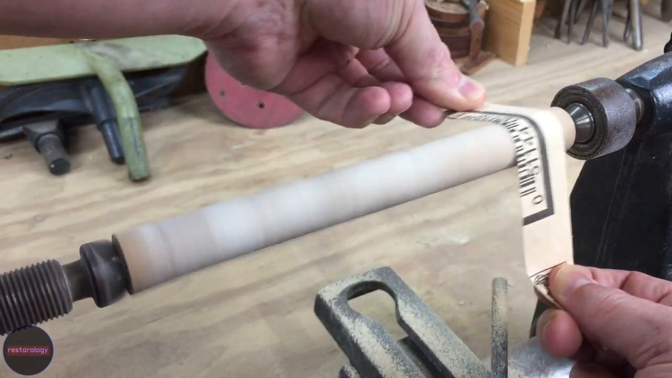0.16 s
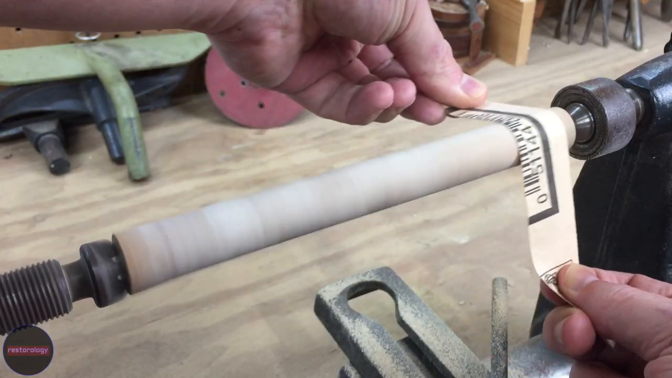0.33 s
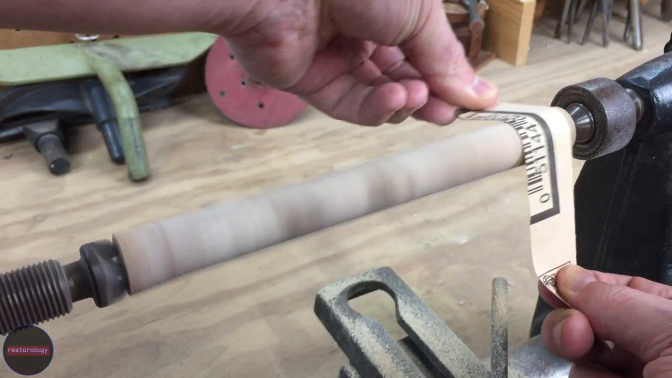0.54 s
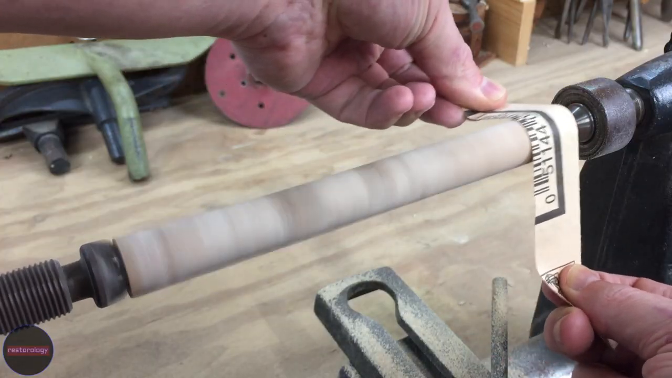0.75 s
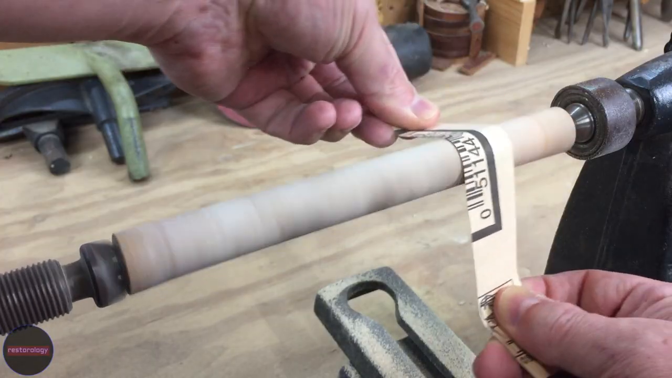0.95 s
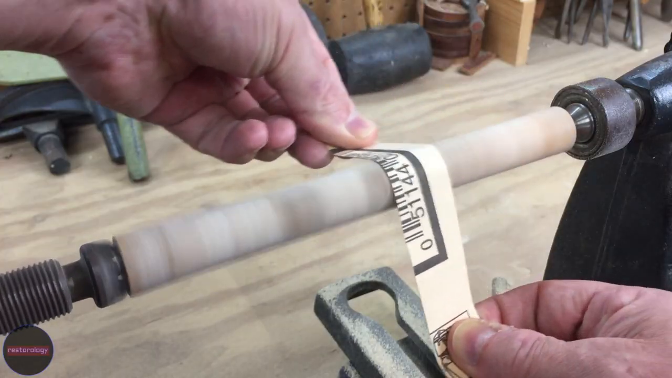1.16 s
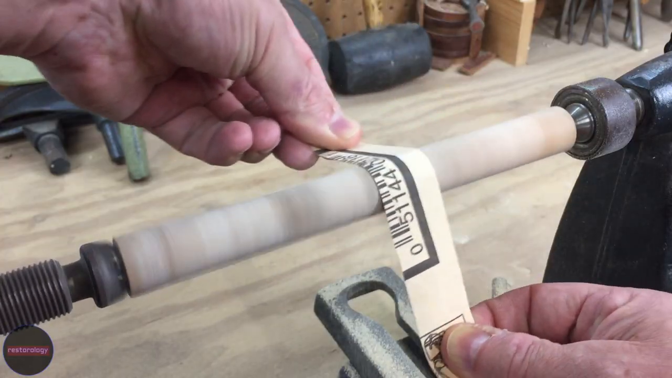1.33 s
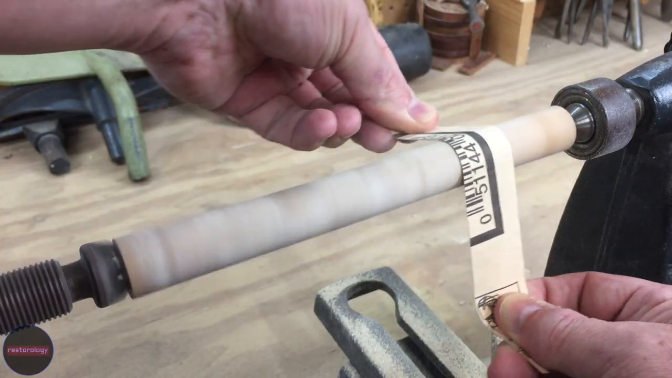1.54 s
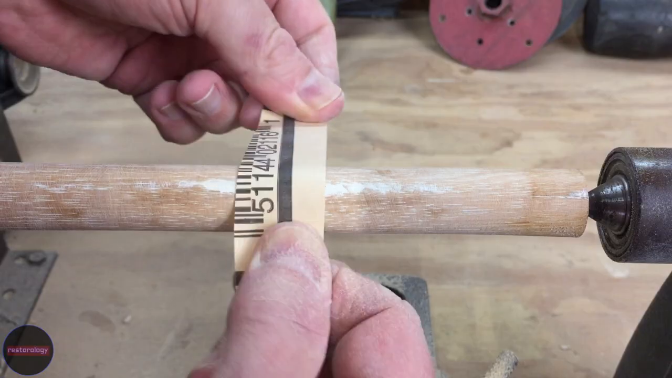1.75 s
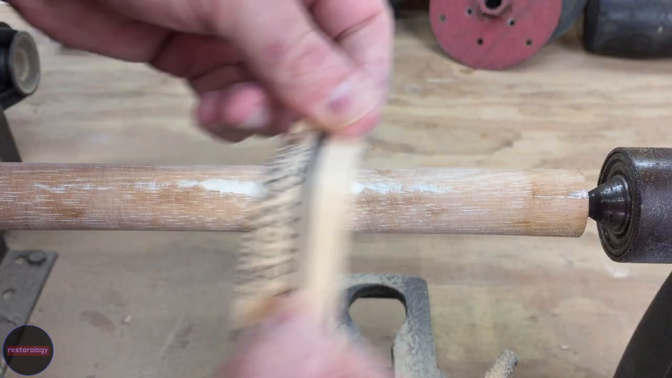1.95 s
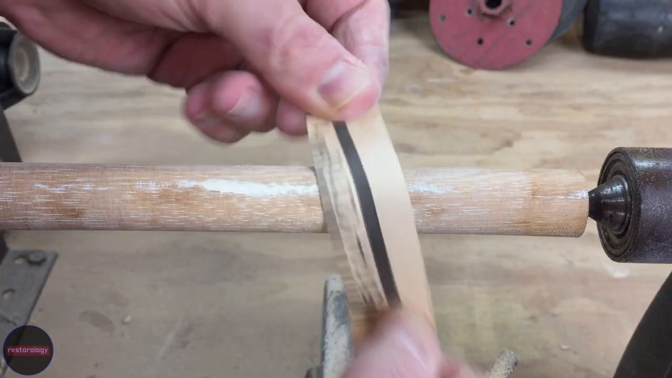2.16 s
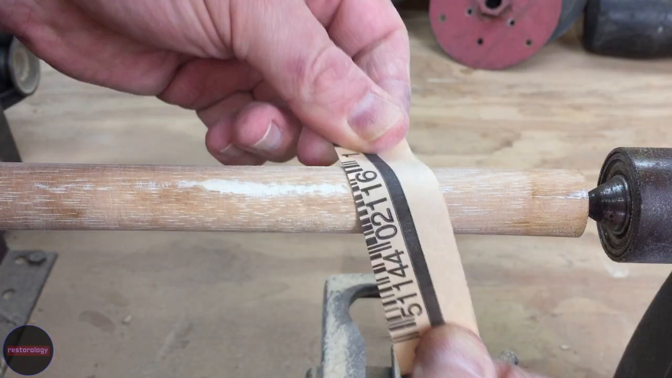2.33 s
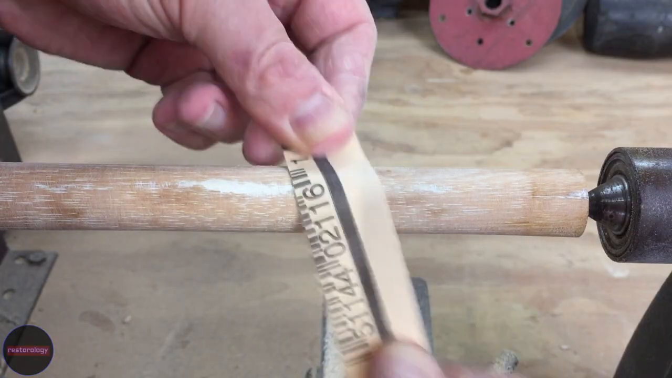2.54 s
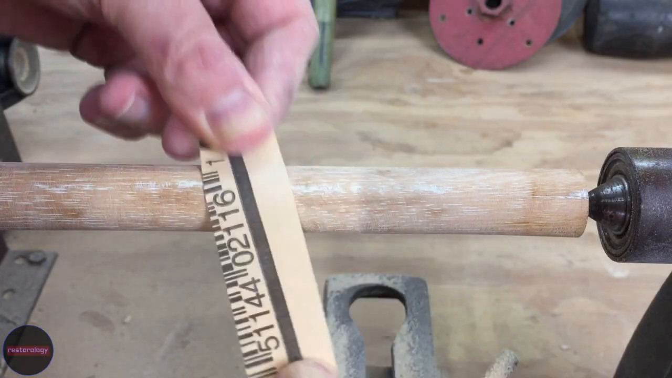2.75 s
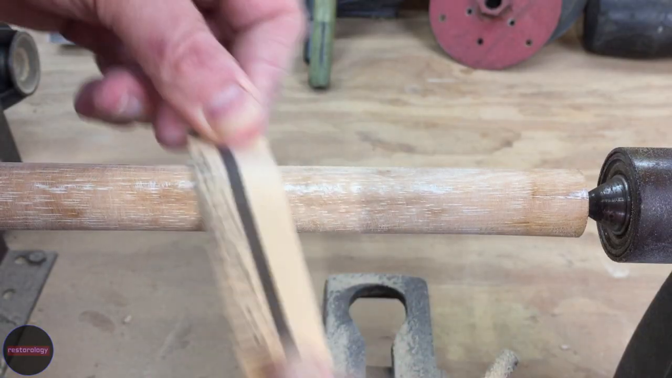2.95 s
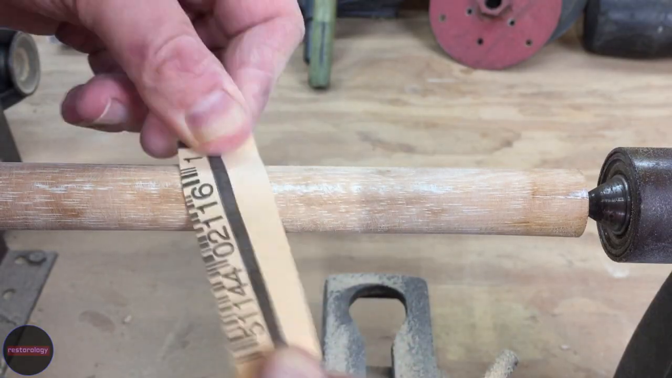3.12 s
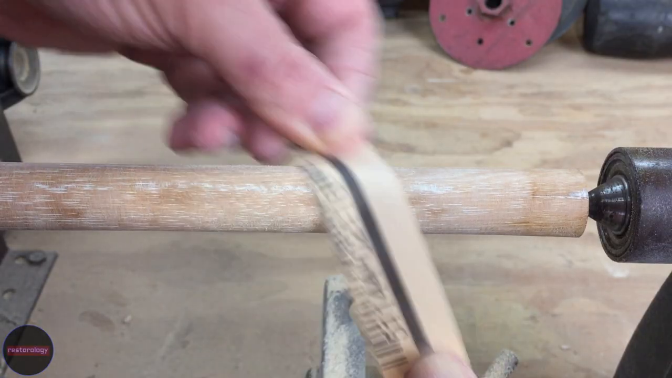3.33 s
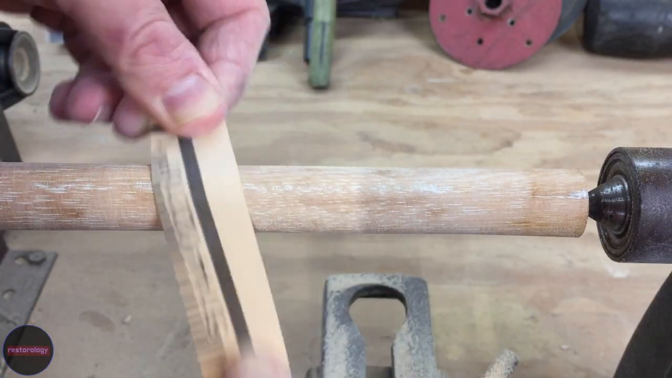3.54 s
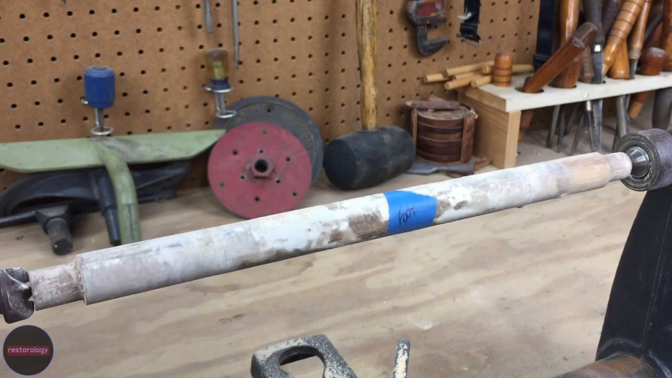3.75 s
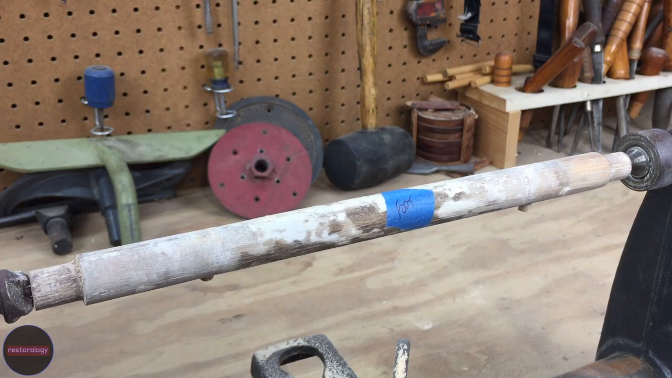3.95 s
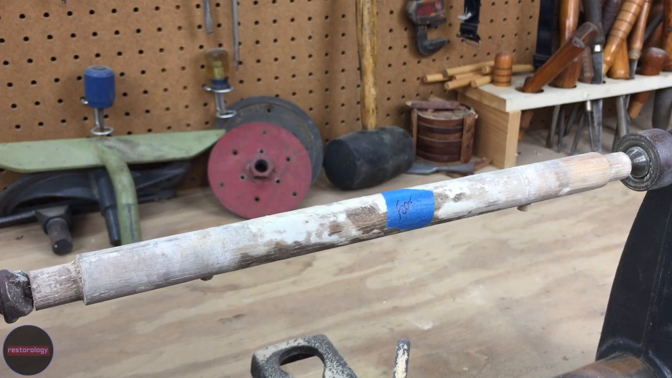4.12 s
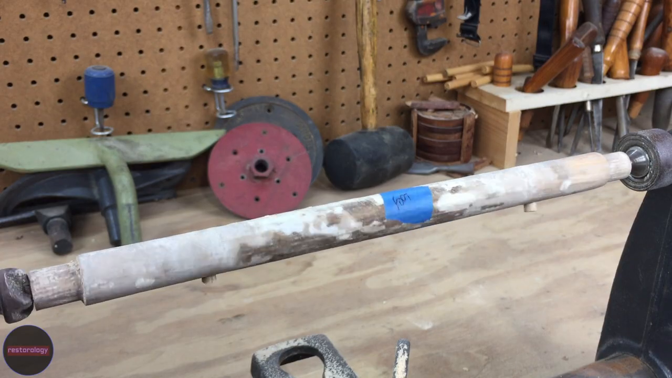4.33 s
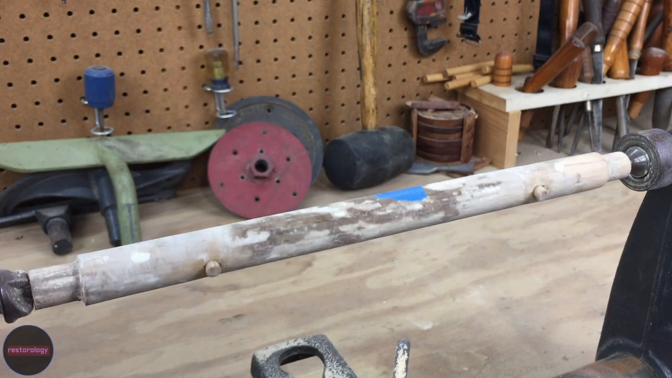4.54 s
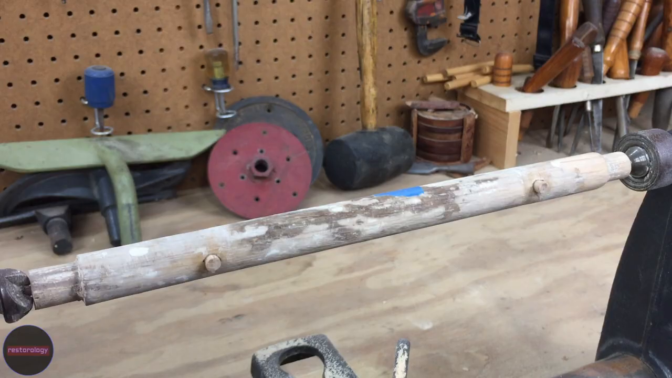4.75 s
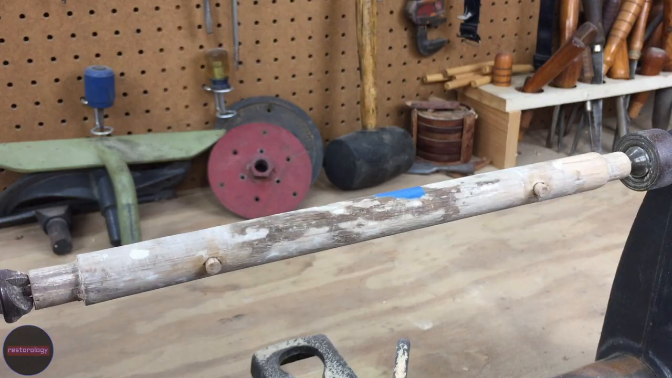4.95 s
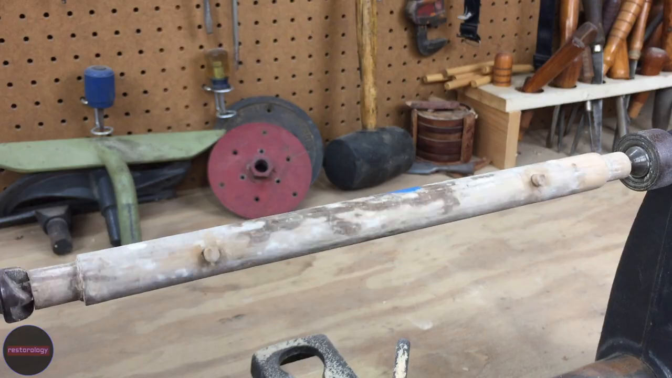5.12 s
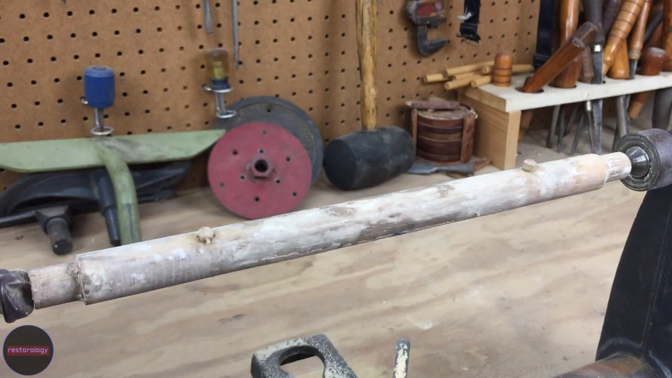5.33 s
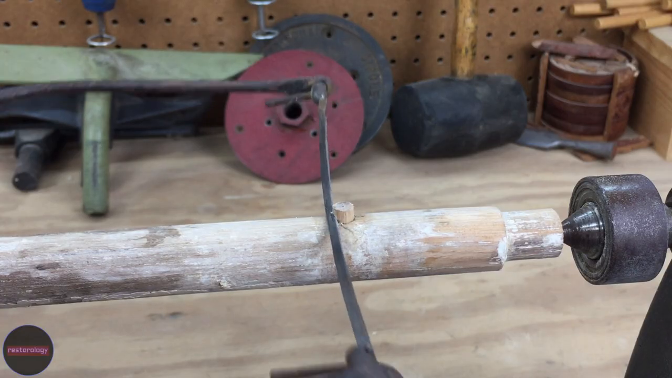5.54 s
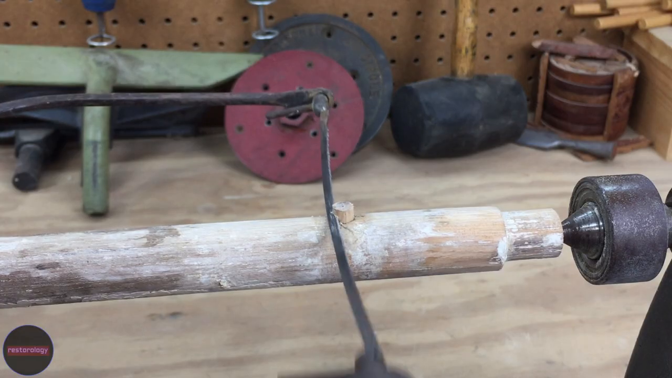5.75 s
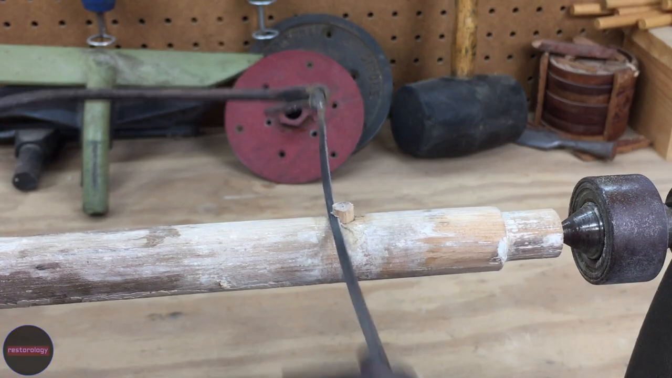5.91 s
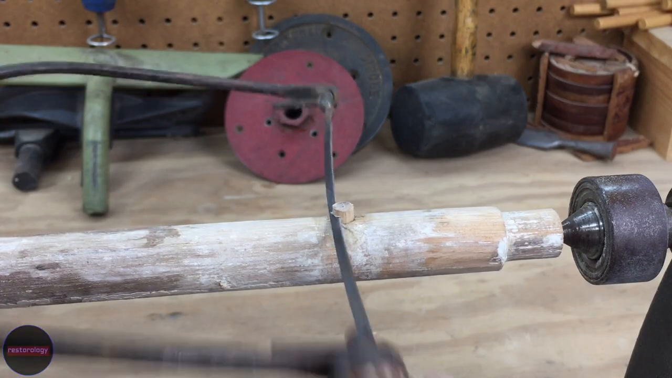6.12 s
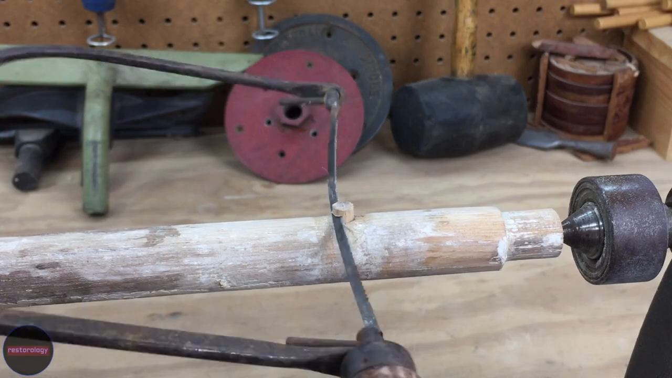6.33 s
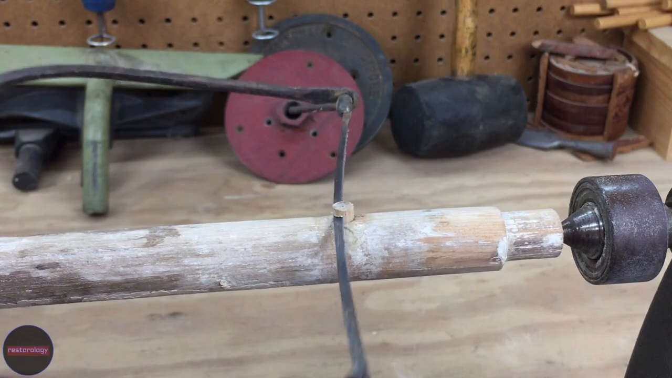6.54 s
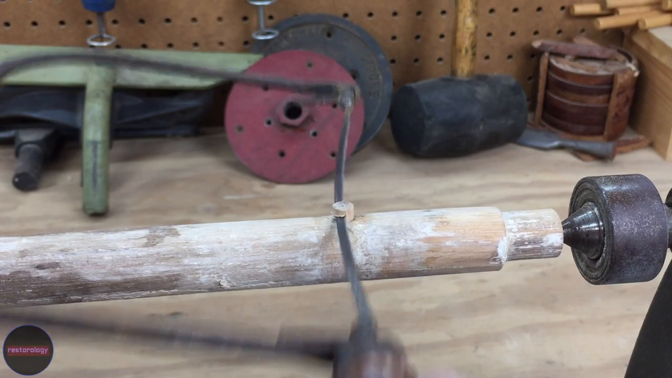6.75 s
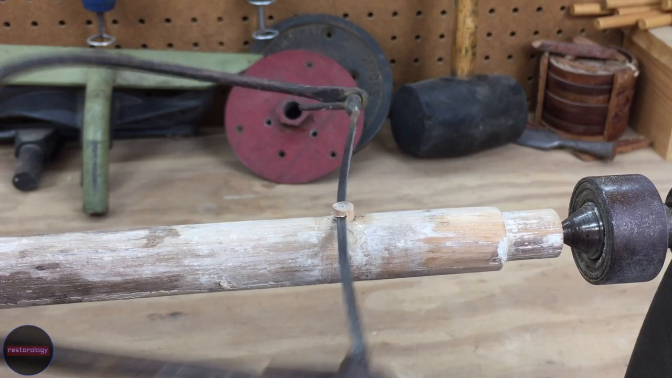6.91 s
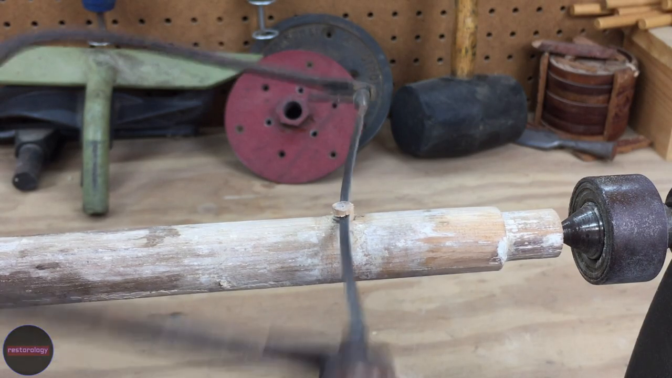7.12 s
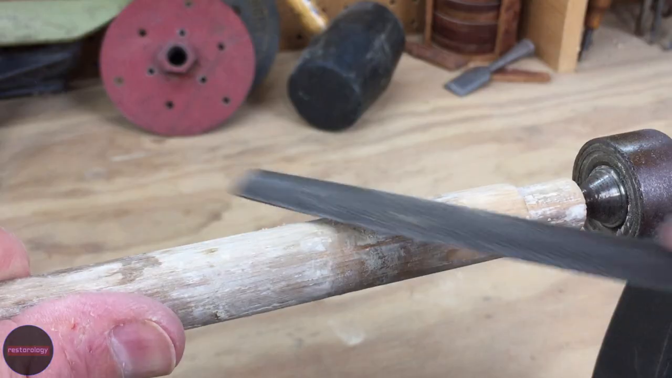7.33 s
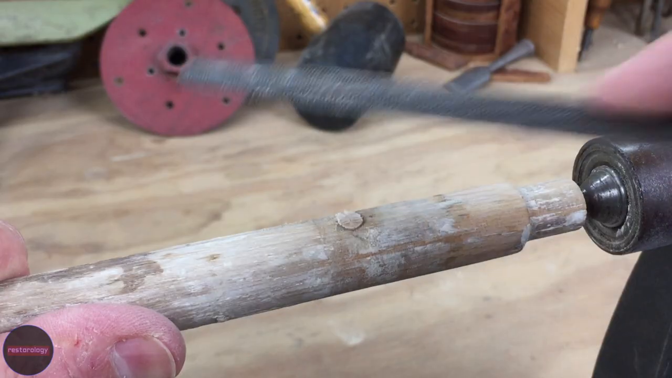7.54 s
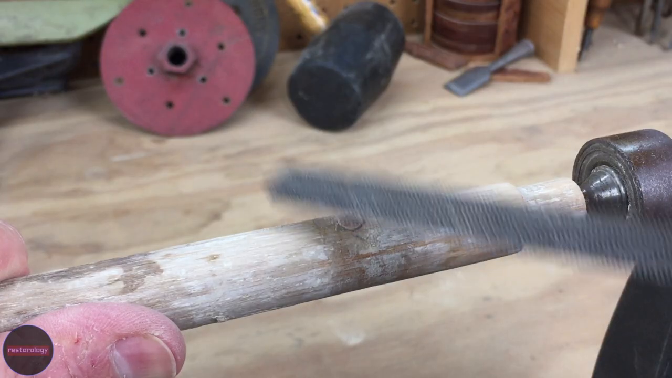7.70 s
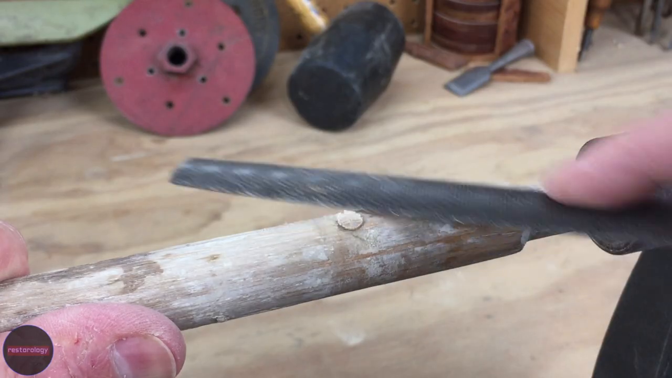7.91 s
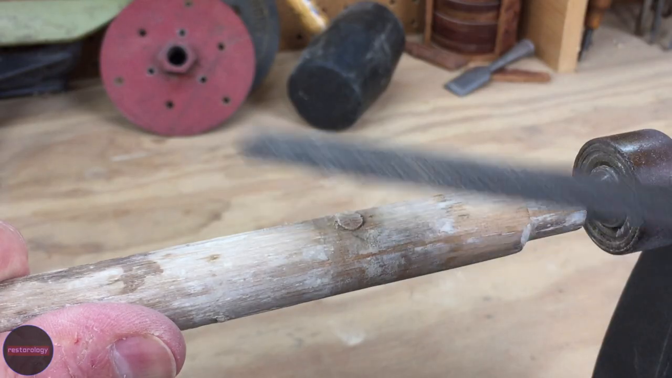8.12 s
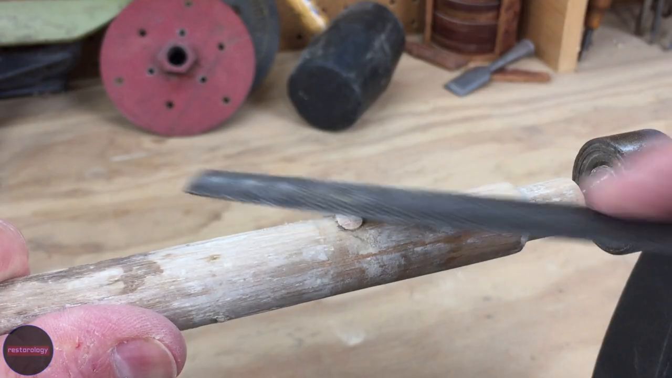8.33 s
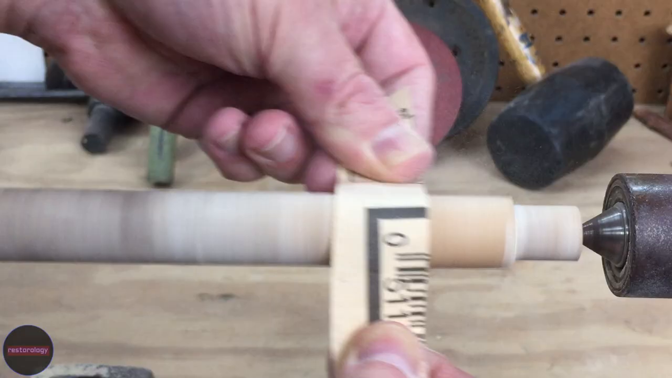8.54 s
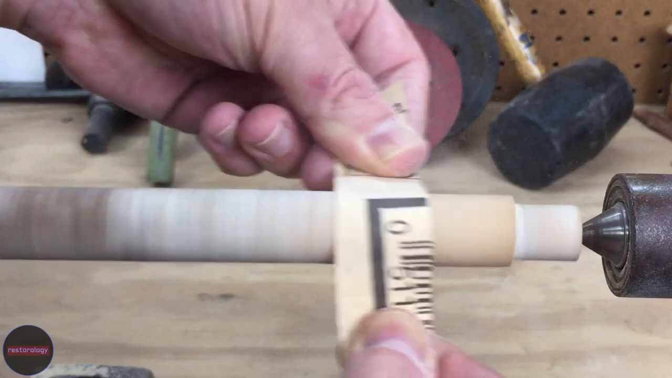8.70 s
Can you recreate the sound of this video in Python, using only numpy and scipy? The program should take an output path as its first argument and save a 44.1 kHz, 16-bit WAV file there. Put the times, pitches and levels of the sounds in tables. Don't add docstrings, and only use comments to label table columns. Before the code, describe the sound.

Steady lathe sanding cuts to frantic paper scrubbing, a quiet gap, buzzing quick saw strokes, three tapping, ringing rasp scrapes, then a returning smooth hiss.

```python
import sys
import numpy as np
from scipy import signal
from scipy.fft import rfft, irfft, next_fast_len
from scipy.io import wavfile
from scipy.ndimage import uniform_filter1d, map_coordinates

SR = 44100
rng = np.random.default_rng(int(sys.argv[2]) if len(sys.argv) > 2 else 0)


def level_to_linear(level):
    exponent = np.asarray(level, float) / 20
    return 10 ** exponent


def store_pcm(level_fs):
    pcm = np.round(np.clip(level_fs, -1, 1) * 32767).astype(np.int16)
    wavfile.write(sys.argv[1], SR, np.atleast_2d(pcm).T)


N = 386757
T = np.arange(N) / SR

SPIN_A, HAND, SAW_A, SAW_B = (-1, 1.6135), (1.6145, 3.742), (5.405, 6.42), (6.45, 7.283)
RASP, SPIN_B = (7.283, 8.573), (8.573, 9.5)

# time in seconds, pull in dB, motor hum in dB.
LATHE = [
    (0.03, 0.5, -42),
    (0.3, 0, -43.5),
    (0.8, -0.5, -43),
    (0.95, 0, -42.5),
    (1.1, 0.5, -45),
    (1.55, 0.63, -41.5),
    (8.62, 1.5, -39.5),
    (8.72, 1.9, -39),
]
# multiple of 118.7 Hz, level in dB, unsteadiness in dB, gain in dB under load.
HUM = [(.364, -7.5, 1.0, 6.5), (1, -3.5, 2, 5), (2, 0, -1.5, 2), (2.551, -8, 3, -7), (3, -5, 1.5, -1),
       (4.05, -10.5, -0.5, 2.5)]
# multiple of 60.7 Hz, level in dB.
MAINS = [(.68, -43), (2, -39), (3, -52), (4, -42.5), (5, -40.5), (7, -40.5), (8, -49), (9, -48.5)]
# frequency in Hz, level in dB per Hz.
SPIN_HISS = [(320, -9), (550, -10), (708, -2), (838, -8), (1230, -6.5), (1740, -5.5), (1890, -3.5),
             (2000, -3.5), (2650, -8.5), (4160, -4), (4850, -7), (6080, -5), (10500, 6.5), (14300, 4),
             (15800, 2)]
# frequency in Hz, width in Hz, lift in dB.
SPIN_RINGS = [(483, 35, 6), (950, 170, 2), (1250, 79, 4), (1900, 53, 4.5), (2405, 40, 7)]
# frequency in Hz, width in Hz, share added.
SHORT_STRIP = [(940, 700, .6), (1870, 380, -0.5), (3940, 1100, -.4)]
# frequency in Hz, level in dB per Hz.
RUMBLE = [(15, -37), (25, -22), (70, -10.5), (113, -7.5), (171, -13.5), (236, -5), (300, -8), (362, -9),
          (403, -9.5), (620, -21), (810, -39), (1360, -120)]


def lathe():
    pull_db, hum_db = curves(LATHE)
    first = T < SPIN_B[0]
    hiss_db = -39 + 1.6 * pull_db
    fizz_db = -34 + 1.1 * pull_db - 2 * shot(SPIN_B)
    rumble_db = -35 - pull_db - 0.5 * shot(SPIN_B)
    paper, flutter = colour(SPIN_HISS, SPIN_RINGS), .5 * wobble(40)

    hiss = filtered(grit(0.7, 900), lambda f: paper(f) / (1 + (f / 8000) ** 6))
    hiss = level_to_linear(hiss_db + 2.0 + flutter) * hiss
    hiss = np.where(first, hiss, filtered(hiss, shorter_strip))
    fizz = filtered(grit(0.68, 900), lambda f: paper(f) / (1 + (8000 / (f + 1)) ** 6))
    fizz = level_to_linear(fizz_db + flutter) * fizz

    taut = filtered(grit(.8, 900), lambda f: 0.83 * ring(f, 6110, 350) + ring(f, 13900, 940))
    taut = level_to_linear(-44 + 4.8 * (hiss_db + 39.5)) * taut * shot(SPIN_A)
    short_song = level_to_linear(-42) * filtered(grit(.8, 900), lambda f: ring(f, 8740, 1300)) * shot(SPIN_B)

    rumble = filtered(grit(0.17, 120, patchy_db=0.0), colour(RUMBLE))
    rumble = level_to_linear(rumble_db - 2.0 + 0.44 * wobble(25)) * rumble
    whine = level_to_linear(-49.0 + 1.6 * wobble(25)) * np.sin(2 * np.pi * 1843 * T + 0.99 * wobble(23))
    machine = np.where(first, motor(hum_db) + whine, last_motor())
    return shot(SPIN_A, SPIN_B) * (walls(hiss + fizz + taut + short_song, -14.5) + rumble + machine)


def shorter_strip(f):
    return 1 + sum(share * ring(f, hz, width) for hz, width, share in SHORT_STRIP)


def motor(hum_db):
    turn = 2 * np.pi * 118.7 * T + .15 * wobble(6)
    load = np.clip((T - 0.78) / 0.22, 0, 1)
    hum = np.zeros(N)
    for k, db, loose, gain_db in HUM:
        level = level_to_linear(hum_db + 4.0 + db + gain_db * load + loose * wobble(8.15))
        hum += level * np.sin(k * turn + k * k)
    return hum


def last_motor():
    hum = np.zeros(N)
    for k, db in MAINS:
        hum += level_to_linear(db + 2.5 + 1.4 * wobble(17)) * np.sin(2 * np.pi * k * 60.7 * T + k * k)
    return hum


# centre of the push in seconds, push in dB, return in dB, dowel note in dB on push,
# on return.
PAPER = [(1.643, -28.5, -27.5, -37.5, -38.5), (1.698, -27, -25, -40, -34.5), (1.75, -28, -25.5, -43, -36),
         (1.803, -29.5, -24.5, -42.5, -35.5), (1.856, -27, -23.5, -37.5, -38),
         (1.908, -26.5, -26.5, -35.5, -37.5), (1.963, -28, -26, -38.5, -28),
         (2.021, -27.5, -30, -34.5, -32), (2.081, -28, -25, -37.5, -34), (2.139, -25.5, -22, -39, -34),
         (2.193, -25, -23, -41.5, -36.5), (2.247, -25, -24, -39, -40), (2.3, -28, -26.5, -38, -38),
         (2.354, -24.5, -27, -33.5, -38), (2.407, -23.5, -24.5, -34.5, -39), (2.46, -27.5, -24, -36.5, -37),
         (2.513, -26, -27.5, -37.5, -36.5), (2.566, -26.5, -23, -33.5, -40), (2.619, -26, -26, -28, -38.5),
         (2.672, -24.5, -25.5, -31.5, -33.5), (2.726, -26, -26, -32, -43),
         (2.778, -26.5, -26, -36.5, -33.5), (2.83, -25.5, -24, -34.5, -36), (2.883, -24.5, -23.5, -33, -35),
         (2.938, -24.5, -25.5, -35, -34.5), (2.991, -25, -24, -35.5, -36.5),
         (3.042, -23.0, -24.5, -33.5, -36), (3.093, -25, -26.5, -33, -33), (3.146, -23.5, -27, -36, -35.5),
         (3.199, -23.5, -23, -34, -34), (3.253, -23.5, -25.5, -33, -37.5),
         (3.308, -25.5, -24.5, -37, -36.5), (3.36, -24.5, -26, -35, -33.5), (3.415, -23, -25, -36.5, -37.5),
         (3.47, -22.5, -24.5, -34, -32.5), (3.525, -22.5, -23.5, -34, -31.5),
         (3.579, -25.5, -26.5, -35.5, -37), (3.632, -26.5, -24, -33, -40), (3.684, -25.5, -25, -30, -35.5),
         (3.736, -32, -30.5, -39, -41.0)]
# frequency in Hz, level in dB per Hz.
PAPER_HISS = [(760, -27), (1300, -6.5), (1460, -11.5), (1870, -5), (2310, -6), (3620, -4.5), (4850, -7.5),
              (6170, -2.5), (8620, -3), (10300, -3.5), (15000, -5), (15800, -33.5)]
# frequency in Hz, level in dB per Hz.
PAPER_BODY = [(88, -47), (150, -19.5), (258, -22.5), (302, -12.5), (469, -13), (550, -3.5), (621, -7),
              (728, -3.5), (799, -4.5), (1400, -12.5), (1820, -37), (3080, -120)]
# frequency in Hz, width in Hz, lift in dB.
PAPER_RINGS = [(306.4, 19, 9), (560, 45, 3), (736, 25, 9.5), (925, 120, 5.5), (1160, 150, 4),
               (1602, 100, 7.5), (1860, 85, 5), (3160, 230, 1)]


def hand_sanding():
    s, db, note_db = to_and_fro(PAPER, swing_s=0.0023)
    snag = np.exp(-((T - 2.025 - .012) / 0.036) ** 4)
    sound = rubbing(s, db, note_db, PAPER_HISS, PAPER_BODY, PAPER_RINGS, width=0.0068,
                    rest_db=-14.0 + 5.5 * snag, grain_db=1.0, patchy_db=1.6)
    return shot(HAND) * sound


# centre of the push in seconds, push in dB, return in dB.
SAW = [(5.417, -42, -48.5), (5.496, -40, -47), (5.569, -41.5, -49), (5.629, -44, -44), (5.71, -42, -49),
       (5.777, -44.5, -48), (5.856, -43, -45), (5.921, -43, -41), (5.993, -42, -44), (6.054, -43, -40.5),
       (6.129, -41, -42.5), (6.206, -38, -43), (6.281, -39.5, -39), (6.355, -39.5, -35.5), (6.42, -52, -38),
       (6.465, -39, -40), (6.538, -40, -41), (6.612, -43, -42), (6.677, -41, -41.5), (6.745, -39, -40),
       (6.813, -37.5, -38.5), (6.882, -40, -41), (6.94, -42, -41), (7.014, -38, -38.5),
       (7.087, -34.5, -38.5), (7.156, -41, -37.5), (7.22, -43, -38.5), (7.283, -39, -43)]
# push in dB, return in dB.
SAW_NOTE = [(-38, -42.5), (-35.5, -36), (-41, -39), (-39, -36.5), (-37.5, -38.5), (-37, -40.5),
            (-36, -36.5), (-32, -34), (-35, -35.5), (-30.5, -32.5), (-34.5, -32.5), (-33.5, -33),
            (-31.5, -33.5), (-30.5, -29), (-36, -44), (-30.5, -33), (-27.5, -33), (-31, -30), (-33, -34),
            (-32, -33), (-29, -33), (-33, -33.5), (-31.5, -34), (-32.5, -29.5), (-32, -31), (-31, -33),
            (-32.5, -31), (-30, -36.5)]
# frequency in Hz, level in dB per Hz.
SAW_HISS = [(820, -32), (1400, -20), (1770, -8.5), (1920, -2.5), (2600, -4), (2820, -7), (3310, -13.5),
            (3860, -9.5), (4490, -8), (6090, -19.5), (9420, -15.5), (10600, -14), (11500, -15),
            (14600, -19), (15800, -40.5)]
# frequency in Hz, level in dB per Hz.
SAW_BODY = [(76, -42), (130, -4), (182, -3), (266, -6.5), (338, 0.5), (483, -10.5), (808, -12.5),
            (977, -15), (1600, -16.5), (2080, -27), (3520, -120)]
# frequency in Hz, width in Hz, lift in dB.
SAW_RINGS = [(184.7, 16.5, 8.5), (348, 59, 4), (563, 54, 6), (705, 51, 6), (840, 130, -6.5), (977, 43, 10),
             (1154, 65, 6.5), (1278, 65, 8), (1900, 72, 5), (2804, 37, 8.5), (3090, 84, 11), (3870, 350, 7),
             (4380, 300, 6.5), (7800, 500, -5), (8400, 200, -0.5), (11100, 500, -5), (12900, 660, 3.5),
             (14400, 700, 7.5)]


def sawing():
    s, db, note_db = to_and_fro(np.hstack([SAW, SAW_NOTE]), swing_s=0.0011)
    sound = rubbing(s, db, note_db - 2.5, SAW_HISS, SAW_BODY, SAW_RINGS, width=0.0049,
                    rest_db=-8.5, grain_db=1.5, patchy_db=2.0)
    return shot(SAW_A, SAW_B, fade=0.0043) * sound


def rubbing(s, db, note_db, hiss, body, rings, width, rest_db, grain_db, patchy_db):
    teeth = strokes(s, db - .7, width, rest_db) * grit(grain_db, 1500, patchy_db)
    push = strokes(s, note_db, 1.175 * width, rest_db + 3.0) * grit(grain_db, 400)
    return walls(filtered(teeth, colour(hiss, rings)) + filtered(push, colour(body, rings)), -17.0)


def to_and_fro(rows, swing_s):
    s, *cols = np.transpose(rows)
    k = np.arange(2 * len(s) - 1)
    pairs = [np.where(k % 2, back[k // 2], push[k // 2]) for push, back in zip(cols[::2], cols[1::2])]
    return np.interp(k / 2, np.arange(len(s)), s) + swing_s * (k % 2), *pairs


def strokes(times, db, width, rest_db):
    power = level_to_linear(2 * (np.interp(T, times, db) + rest_db))
    for s, level in zip(times, db):
        near = slice(round((s - .04) * SR), round((s + 0.034) * SR))
        power[near] += level_to_linear(2 * level) * np.exp(-np.abs((T[near] - s) / width) ** 2.2)
    return np.sqrt(power)


# start in seconds, peak in dB, crack in Hz, dowel note in Hz.
TAPS = [
    (7.3298, -6.5, 2090, 355),
    (7.829, -2, 2620, 390),
    (8.2905, -4.5, 2060, 391),
]
# lift in seconds, scrape in dB, first skid in dB, fizz in dB, dowel note in dB.
PASSES = [
    (0.19, -24.5, -28.5, -33, -43),
    (.2, -25, -35, -31, -38),
    (0.18, -25, -32, -33.5, -31),
]
# frequency in Hz, 60 dB decay in seconds, level in dB on each of three passes.
STEEL = [(341, 0.76, -41, -45, -43.5), (403, 0.7, -68, -50, -62), (696, 1, -45.5, -58, -49),
         (721, 0.93, -72, -53, -50), (910, 0.53, -53, -55, -49), (1314, 0.62, -55.5, -62, -64),
         (1690, 0.4, -69, -52, -64), (2310, 0.19, -48.5, -60, -58)]
# frequency in Hz, level in dB per Hz.
RASP_HISS = [(120, -48), (200, -10), (390, -6), (472, -34), (541, -9), (792, -16), (1030, -7.5),
             (1770, -13), (2090, -6.5), (2590, -16.5), (3270, -14.5), (5200, -22), (6760, -60),
             (11400, -120)]
# frequency in Hz, level in dB per Hz.
RASP_FIZZ = [(3500, -19.5), (5000, 3), (7200, -7), (9300, -0.5), (10800, -4.5), (12500, -12.5),
             (15000, -8.5)]
# frequency in Hz, width in Hz, lift in dB.
RASP_RINGS = [(544, 69, 5), (934, 70, 5.5), (1050, 50, -1.5), (1485, 40, 5), (2230, 37, -3.5),
              (3240, 220, 2), (9200, 1100, 2.5)]


def rasp():
    out, force, fizz = np.zeros((3, N))
    modes = [level_to_linear(1.3 * wobble(30)) * np.sin(2 * np.pi * hz * T + .3 * wobble(25)) for hz, *_ in STEEL]
    for k, (stroke, landing) in enumerate(zip(PASSES, TAPS)):
        lift, scrape_db, skid_db, fizz_db, note_db = stroke
        s, db, crack_hz, note_hz = landing
        t = T - s
        contact = shot((s + 0.0013, s + .39), fade=0.0027)
        trail = level_to_linear(-81.5 - 94 * np.maximum(t - .26, 0))

        bite_db = plateau(t, 0.084, lift, 267.5, 619) - 100.5 * np.maximum(t - lift + 0.062, 0)
        skid = level_to_linear(skid_db - 430 * np.abs(t - .012))
        force += contact * (level_to_linear(scrape_db + bite_db) + skid + trail)

        speed_db = plateau(t, 0.059, lift, 2 * 267.5, 2 * 619) - 91 * np.abs(t - .085)
        fizz += contact * (level_to_linear(fizz_db + speed_db) + level_to_linear(-68 - 300 * np.abs(t)) + level_to_linear(-20) * trail)

        sing = level_to_linear(note_db + plateau(t, lift - 0.045, lift + 0.017, 518, 518)) + level_to_linear(-60.5 - 27 * np.abs(t))
        note = level_to_linear(3.7 * wobble(45)) * np.sin(2 * np.pi * note_hz * T + 1.0 * wobble(40))
        out += contact * sing * note

        lifted = np.maximum(t - .2, 0)
        steel = sum(level_to_linear(levels[k] - 60 * lifted / t60) * mode for (_, t60, *levels), mode in zip(STEEL, modes))
        out += shot((s, s + 0.44), fade=0.027) * np.clip(t / .17, 0, 1) ** 2 * steel
        out += tap(s, db, crack_hz)
    teeth = level_to_linear(1.34 * wobble(150))
    force = force * teeth * grit(1.2, 900)
    out += chatter() + filtered(force, colour(RASP_HISS, RASP_RINGS))
    out += level_to_linear(-20) * filtered(force, lambda f: ring(f, 150, 90) ** 2)
    out += filtered(fizz * teeth * grit(3.0, 1700), colour(RASP_FIZZ, RASP_RINGS))
    return shot(RASP) * walls(out, -14.5)


# centre in seconds, peak in dB, frequency in Hz, half length in seconds.
CHATTER = [(7.431, -25.5, 1036, 0.01), (7.433, -26, 560, 0.0064), (7.435, -25, 924, 0.01),
           (7.476, -27.5, 705, 0.015), (7.477, -30, 1480, 0.033), (7.483, -33, 348, 0.028),
           (7.488, -28, 910, 0.018), (7.519, -25.5, 357.4, 0.033), (7.926, -29, 1346, 0.013),
           (7.935, -31, 588, 0.013), (7.963, -32, 1055, 0.011), (7.968, -28, 404, 0.013),
           (8.011, -26, 1126, 0.011), (8.016, -20, 394, 0.0076), (8.055, -28.5, 381, 0.024),
           (8.423, -21, 391, 0.017), (8.425, -25, 1050, 0.014), (8.452, -20.5, 392, 0.017)]


def chatter():
    out, judder = np.zeros(N), 0.44 * wobble(70)
    for s, db, hz, half in CHATTER:
        swell = np.exp(-((T - s) / (1.06 * half)) ** 2)
        out += level_to_linear(db - 1.5) * swell * np.sin(2 * np.pi * hz * (T - s) + judder)
    return out


# frequency in Hz, width in Hz, level in dB.
WOOD = [(888, 35, 7), (1050, 96, 1.5), (1480, 120, -4.5), (1940, 123, 4.5), (2050, 115, 6),
        (2170, 165, 6.5), (2520, 340, -10.5), (3230, 160, -22), (4740, 280, -24.5)]


def tap(s, db, crack_hz):
    blow = np.zeros(N)
    blow[round(s * SR)] = level_to_linear(db + 9)
    fall = lambda start, t60: (T > start) * level_to_linear(-60 * np.abs(T - start) / t60)
    rattle = fall(s + 0.00077, 0.032) + 0.2 * fall(s + 0.0085, 0.029)
    rattle = level_to_linear(db - 10.5) * rattle * rng.standard_normal(N)
    wood = lambda f: sum((-1) ** k * level_to_linear(level) * ring(f, hz, width) for k, (hz, width, level) in enumerate(WOOD))
    crack = filtered(blow, lambda f: -ring(f, crack_hz, 2360) ** 3 / (1 + 1j * f / 4500) ** 2)
    thud = level_to_linear(-18) * filtered(rattle, lambda f: ring(f, 260, 220))
    return crack + filtered(rattle, wood) + thud


def plateau(t, start, end, rise_db_s, fall_db_s):
    knee = lambda db: 10 / np.log(10) * np.logaddexp(0, db * np.log(10) / 10)
    return -knee((start - t) * rise_db_s) - knee((t - end) * fall_db_s)


# start in seconds, peak in dB, centre in Hz, 60 dB decay in seconds.
TICKS = [(3.0891, -6.5, 10500, 0.011), (3.681, -28, 900, 0.036), (3.745, -71, 3500, .12),
         (4.733, -50, 3900, 0.025), (5.128, -55, 3600, 0.044), (5.185, -54, 3800, 0.039),
         (5.253, -54, 4100, 0.04), (6.05, -29, 1800, 0.07), (7.192, -22, 11000, 0.018),
         (7.316, -57, 2000, .1), (7.806, -59, 2600, .1), (8.265, -66, 2200, 0.15)]
# start in seconds, peak in dB, centre in Hz.
CATCHES = [(5.4937, -24, 3720), (5.7054, -34, 3940), (5.8055, -35, 4290), (6.048, -33, 2760),
           (6.1268, -39, 3810), (6.2046, -34, 2780), (6.2789, -29, 3810), (6.386, -26, 4380),
           (6.4575, -31, 4340), (6.8072, -25, 3140), (6.8438, -32, 2754), (7.0447, -29, 2760),
           (7.0855, -22, 3960), (7.153, -20, 3080), (7.1908, -12.5, 3680), (7.215, -23, 4310)]
# start in seconds, peak in dB, centre in Hz.
SNAPS = [(1.668, -32, 4000), (1.8816, -14, 1900), (1.9346, -21, 6200), (2.1042, -14, 3000),
         (2.1636, -17.5, 3000), (2.2709, -15, 1900), (2.3274, -18.5, 2500), (2.9089, -15.5, 6000),
         (3.1933, -24, 7000), (3.252, -20, 5000)]
# start in seconds, peak in dB, frequency in Hz, 60 dB decay in seconds.
KNOCKS = [(1.988, -31, 230, 0.14), (1.989, -27, 950, 0.07), (2.03, -28, 560, 0.1), (3.75, -49, 180, 0.093),
          (3.79, -55, 350, 0.2), (4.105, -68, 2720, .15), (4.158, -57, 535, 0.15), (4.165, -55, 350, 0.12),
          (4.289, -57, 686, 0.086), (4.295, -47, 131, 0.11), (4.68, -62, 554, .08), (4.7, -71, 2750, .2),
          (4.742, -55, 350, .08), (4.744, -58, 615, 0.064), (4.86, -71, 2800, .3), (4.89, -67, 4700, .1),
          (4.9, -65, 2950, 0.072), (4.925, -59, 350, .12), (4.972, -50, 360, 0.08), (5.13, -61, 950, .06),
          (5.254, -62, 980, .06), (5.345, -57, 350, 0.11), (5.412, -38, 316, .09), (6.455, -31, 175, 0.14),
          (7.04, -33, 187, 0.35), (7.135, -27, 187, 0.32)]
# centre in seconds, level in dB, length in seconds, centre in Hz.
RUBS = [(3.92, -76, .1, 1500), (4.028, -64, 0.046, 11500), (4.45, -78, 0.11, 1500), (4.65, -72, .07, 860),
        (4.66, -75, .08, 3500), (4.88, -72, .07, 12000), (4.899, -73, 0.052, 3600), (4.91, -70, .06, 520),
        (5.188, -79, 0.072, 900), (5.24, -70, 0.09, 540)]


def handling():
    out, t = np.zeros(N + SR), np.arange(SR // 4) / SR

    def band(hz, q):
        sos = signal.butter(2, [hz / q, min(hz * q, 20000)], "band", fs=SR, output="sos")
        return unit(signal.sosfilt(sos, rng.standard_normal(len(t))))

    catches = [(s, db - 9, hz, .015) for s, db, hz in CATCHES]
    snaps = [(s, db - 9.5, hz, .045) for s, db, hz in SNAPS]
    for s, db, hz, t60 in TICKS + catches + snaps:
        out[round(s * SR):][:len(t)] += level_to_linear(db - 2.5 - 60 * t / t60) * band(hz, 1.4)
    for s, db, hz, t60 in KNOCKS:
        soft_start = 1 - np.exp(-t / 0.00089)
        out[round(s * SR):][:len(t)] += level_to_linear(db - 60 * t / t60) * np.sin(2 * np.pi * hz * t) * soft_start
    for s, db, length, hz in RUBS:
        swell = np.exp(-((t - .125) / length) ** 2 * 2)
        out[round((s - .125) * SR):][:len(t)] += level_to_linear(db) * swell * band(hz, 1.43)
    return out[:N]


# centre in seconds, level in dB, half length in seconds.
JOLTS = [
    (3.78, -54.5, .06),
    (4.303, -55, 0.071),
    (4.724, -57, .07),
    (5.134, -58, 0.063),
    (5.33, -65, .06),
    (7.41, -40.5, 0.064),
    (7.978, -47.5, 0.15),
    (8.358, -37, 0.05),
]
# frequency in Hz, level in dB per Hz.
BED_TONE = [(12, -49.5), (20, -15), (43, -3), (59, 4.5), (74, 4), (118, -13), (140, -21.5), (180, -28.5),
            (310, -120)]
# time in seconds, frequency in Hz, level in dB.
SWAY = [(5.41, 55.8, -33.5), (5.68, 64.9, -51), (5.988, 55.7, -40), (6.248, 65.3, -36),
        (6.372, 56.8, -35.5), (6.862, 61.7, -43), (7.04, 57.9, -31.5), (7.118, 64.5, -42),
        (7.28, 55.8, -52)]
# frequency in Hz, level in dB per Hz.
ROOM_AIR = [(65, -31), (110, -2), (177, -8), (345, -11), (500, -17), (800, -23), (1980, -26), (4930, -29),
            (5830, -31), (15800, -38)]


def workshop():
    saw_db = uniform_filter1d(curves(SAW)[0], size=SR // 4)
    shake = level_to_linear(-51.5) * shot(HAND, fade=0.028) + level_to_linear(-66.5)
    shake += level_to_linear(saw_db) * shot(SAW_A, SAW_B, fade=0.013)
    shake += level_to_linear(-59.5) * shot(RASP, fade=0.041)
    shake += sum(level_to_linear(db) * np.exp(-((T - s) / half) ** 2) for s, db, half in JOLTS)
    bed = shake * filtered(grit(0.79, 32), colour(BED_TONE)) * shot((HAND[0], RASP[1]))
    air = level_to_linear(-65.5 + 1.0 * wobble(5.2)) * filtered(grit(.6, 300), colour(ROOM_AIR))
    sway_hz, sway_db = curves(SWAY)
    sway = np.sin(2 * np.pi * np.cumsum(sway_hz) / SR + 1.2 * wobble(14))
    sway = level_to_linear(sway_db + 0.5 + 1.0 * wobble(13)) * sway * shot(SAW_A, SAW_B, fade=0.0058)
    return bed + sway + air


def walls(x, db):
    t = np.arange(SR // 3) / SR
    tail = signal.lfilter([1], [1, -.6], rng.standard_normal(len(t)))
    tail = tail * level_to_linear(-60 * t / 0.26) * (t > .002)
    return x + level_to_linear(db) * signal.fftconvolve(x, tail / np.linalg.norm(tail))[:N]


def grit(grain_db, rate, patchy_db=1.0):
    z = signal.stft(rng.standard_normal(N + 512), nperseg=256)[2]
    field = uniform_filter1d(uniform_filter1d(rng.standard_normal(z.shape), 5, 0), 5, 1)
    noise = signal.istft(z * level_to_linear(patchy_db * unit(field)), nperseg=256)[1][:N]
    return unit(noise * level_to_linear(grain_db * wobble(rate)))


def colour(spectrum, rings=()):
    hz, db = np.transpose(spectrum)

    def response(f):
        broad = level_to_linear(np.interp(np.log(np.minimum(f, 14600) + 1), np.log(hz + 1), db))
        return broad * (1 + sum((level_to_linear(lift) - 1) * ring(f, c, w) for c, w, lift in rings))
    return response


def ring(f, hz, width):
    return 1j * f * width / (hz * hz - f * f + 1j * f * width + 1e-9)


def filtered(x, response):
    m = next_fast_len(N + SR)
    gain = response(np.fft.rfftfreq(m, 1 / SR))
    return irfft(rfft(x, m) * gain / np.sqrt(np.mean(np.abs(gain) ** 2)), m)[:N]


def shot(*spans, fade=.001):
    return sum(np.clip(np.minimum(T - a, b - T) / fade, 0, 1) for a, b in spans)


def curves(rows):
    s, *cols = np.transpose(rows)
    return [np.interp(T, s, c) for c in cols]


def wobble(rate):
    return map_coordinates(rng.standard_normal(int(N * rate / SR) + 4), [T * rate])


def unit(x):
    return x / np.sqrt(np.mean(x ** 2) + 1e-20)


def scene():
    mono = lathe() + hand_sanding() + sawing() + rasp() + handling() + workshop()
    return np.array([mono, mono])


def roll_off(x):
    return signal.sosfilt(signal.butter(12, 17000, fs=SR, output="sos"), x)


# frequency in Hz, width in Hz, depth from 0 to 1.
MIC_DIPS = [(4890, 370, 0.31), (10420, 500, 0.6), (13560, 440, 0.19)]


def record(dry):
    f = np.fft.rfftfreq(N, 1 / SR)
    dips = np.prod([1 - depth * ring(f, hz, width) for hz, width, depth in MIC_DIPS], axis=0)
    housing = dips / (1 + (f / 15800) ** 300)
    mix = irfft(rfft(dry) * housing, N)
    return roll_off(mix)


dry = scene()
out = record(dry)
store_pcm(out)
```